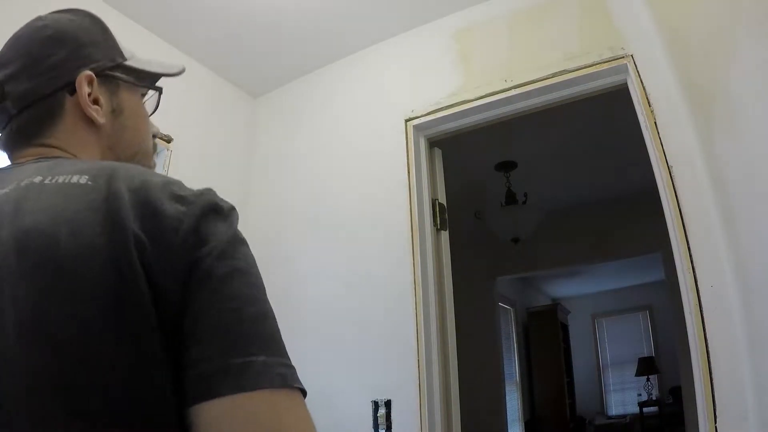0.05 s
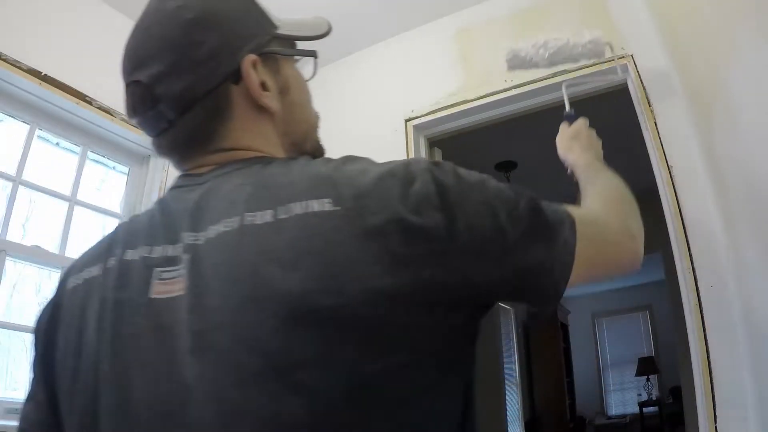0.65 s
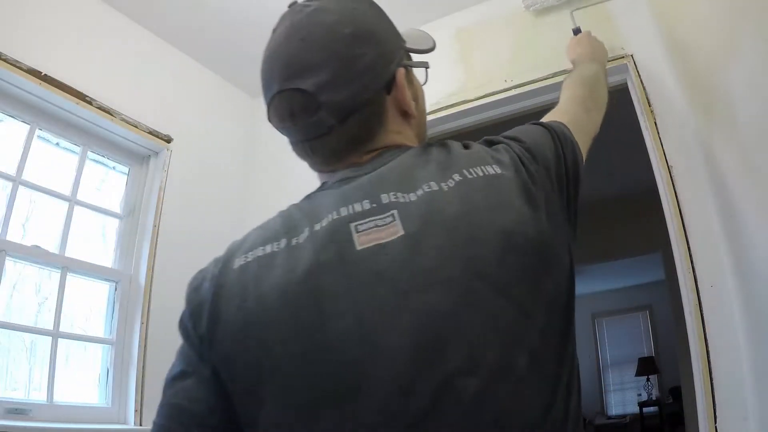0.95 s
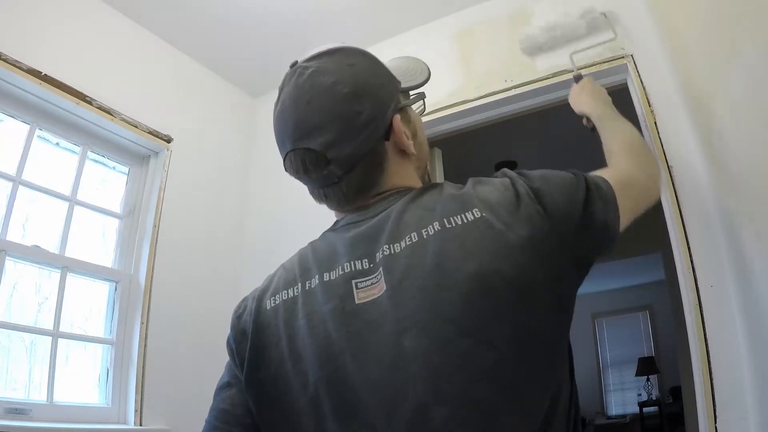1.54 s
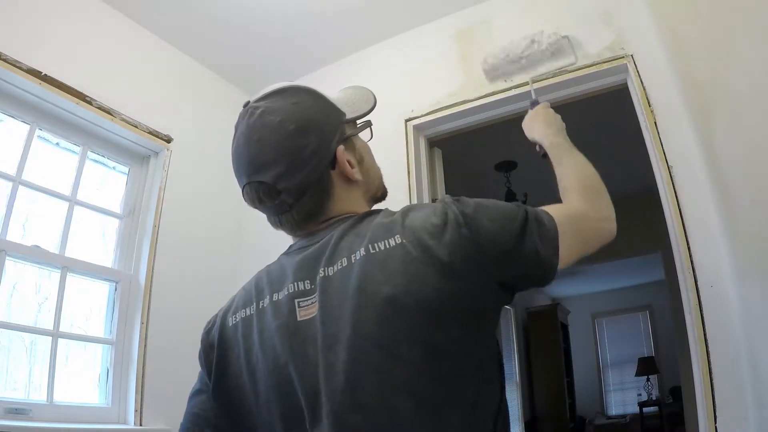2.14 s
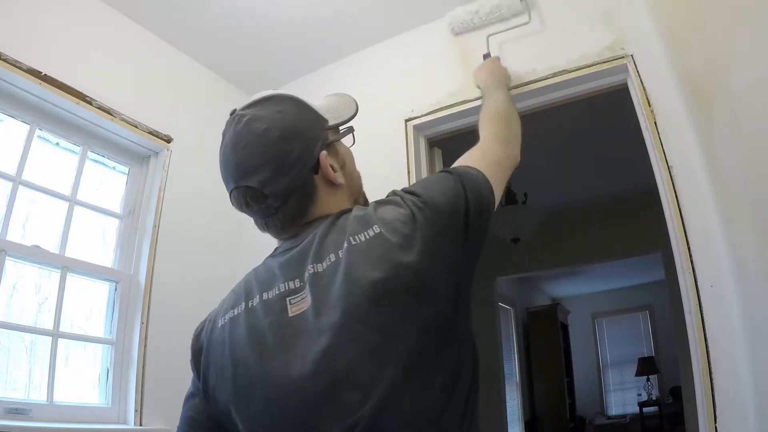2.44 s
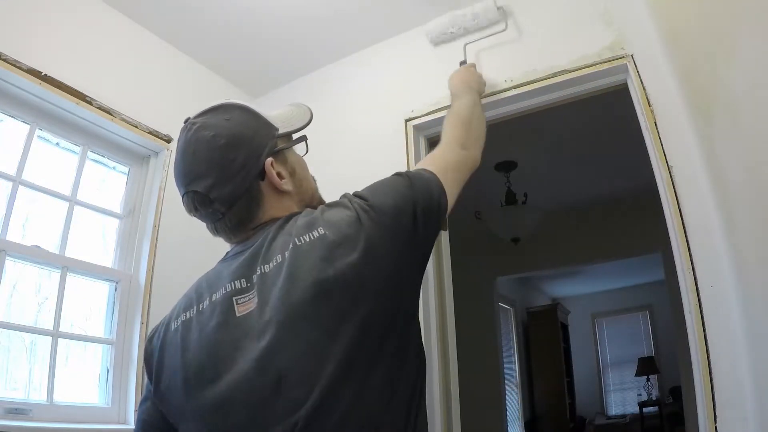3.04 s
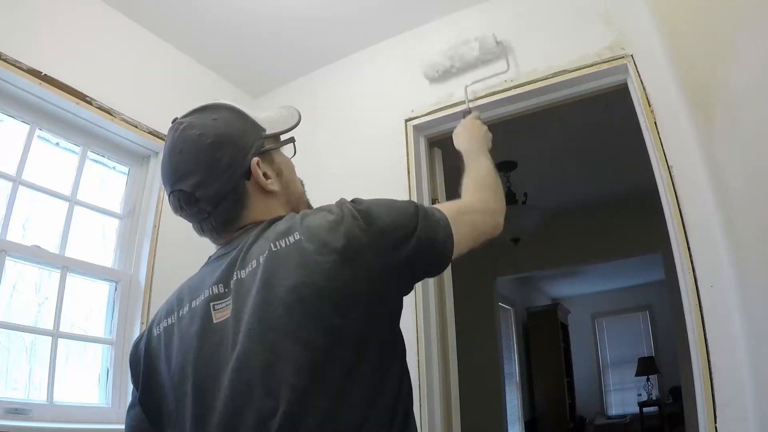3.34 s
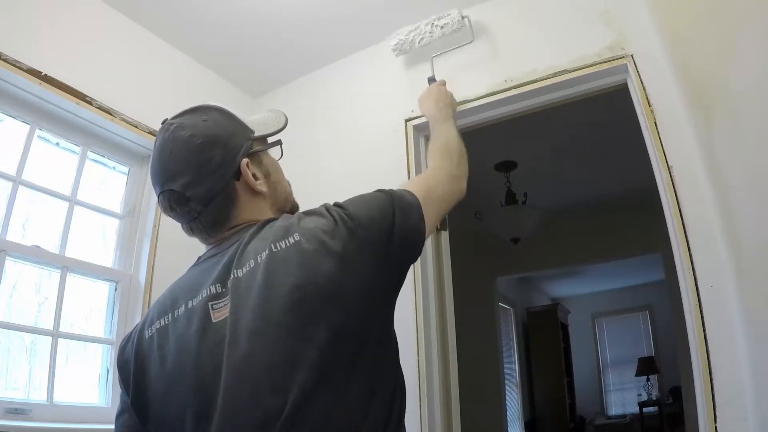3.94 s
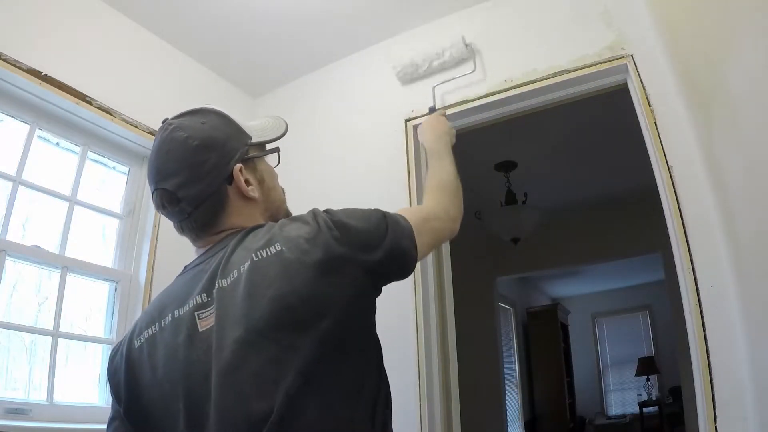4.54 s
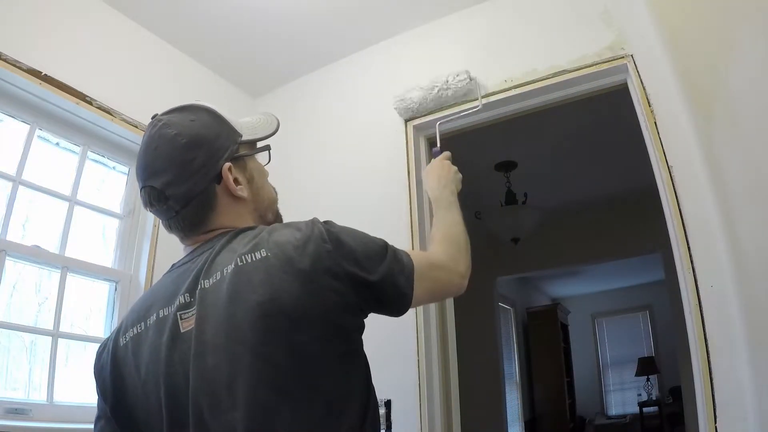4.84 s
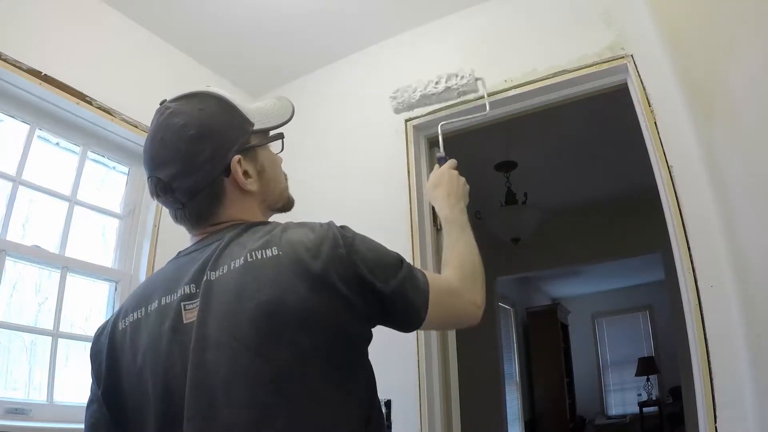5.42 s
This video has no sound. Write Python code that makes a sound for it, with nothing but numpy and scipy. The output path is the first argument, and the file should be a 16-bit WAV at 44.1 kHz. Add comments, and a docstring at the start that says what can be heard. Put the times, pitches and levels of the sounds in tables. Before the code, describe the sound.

A wet paint roller works over a hollow wall, slightly to the right, in a small room with a faint steady hush. It starts with short wet dabs, rustling clothes and low puffs of air against the microphone. Repeated sticky hissing strokes follow, each swelling and easing, with the roller thumping the wall and clacking in its wire frame. Faint sliding squeaks come through. The strokes pause briefly, then carry on more gently.

```python
"""A small bare room, where a wet paint roller is worked up and down the wall above a door.
Each stroke speeds up and slows again: threads of tacky paint snap off the nap as a hiss, and the
hollow wall rumbles beneath. Where a downstroke turns, the roller knocks in its wire frame and thumps
the wall. Faint tones slide in pitch. At first, as the painter steps up, clothes rustle and the
stirred air rumbles at the microphone."""
import sys
import numpy as np
from scipy import signal
from scipy.fft import rfft, irfft, next_fast_len
from scipy.io import wavfile
from scipy.ndimage import uniform_filter1d, map_coordinates

SR = 44100
rng = np.random.default_rng(int(sys.argv[2]) if len(sys.argv) > 2 else 0)


def transcribe(u):
    """Save the signal u as a 16-bit wav file named by the first command-line argument.

    u: samples, shape (n,) or (channels, n), limited to [-1, 1]; the rate is SR.
    q: integer samples, one column per channel.
    """
    v = np.clip(np.atleast_2d(u).T, -1, 1)
    q = np.round(v * 32767).astype(np.int16)
    wavfile.write(sys.argv[1], SR, q)


N = 250488

# Spectra of snapping paint and of the rumbling wall. Each row: frequency in Hz, relative level in dB.
HISS_SPECTRUM = [(400, -68), (2000, -26.5), (4500, -10.5), (5500, -3), (6300, 0.5), (7300, -3.5),
                 (8200, -10.5), (9700, -15), (11200, -26.5), (12500, -23.5), (15000, -35)]
RUMBLE_SPECTRUM = [(90, -49), (135, -2.5), (175, -7), (212, 1), (250, -7.5), (285, 0), (350, -10.5),
                   (450, -14.5), (900, -22), (2500, -66)]


def roller():
    """Shot noise: countless tiny snaps merge into hiss, rasp and squelch over the wall's rumble."""
    # Spectra of the dry and the wet nap. Each row: frequency in Hz, relative level in dB.
    rasp_spectrum = [(900, -15), (1800, -8.5), (2500, -2.5), (3400, -0.5), (4500, -4.5), (6500, -21),
                     (12000, -49)]
    squelch_spectrum = [(150, -17), (380, -3), (480, -4), (650, -0.5), (1000, -4.5), (1300, -2),
                        (1800, -4.5), (2600, -13), (5000, -47)]
    tack, dry, wet, roll = roller_gains()
    lumps = wobble(45)  # the nap is unevenly loaded
    tack *= amp(1.8 + 0.39 * lumps + 1.2 * wobble(70))
    hiss = tack * stereo(crackle(per_second=14000, spread_db=2.5), HISS_SPECTRUM)
    dry *= amp(1.0 + 1.57 * lumps + 0.97 * wobble(24.79))
    rasp = dry * stereo(crackle(per_second=8000, spread_db=1.5), rasp_spectrum)
    wet *= amp(2.0 + 0.66 * lumps + 1.26 * wobble(16))
    squelch = wet * stereo(crackle(per_second=2500, spread_db=1.5), squelch_spectrum)
    rumble = roll * amp(4 + 2.5 * lumps) * noise(RUMBLE_SPECTRUM)
    paint = room(hiss + rasp + squelch, wet_db=-12)
    return high_pass(paint + rumble, edge_hz=143)


def roller_gains():
    """Incoherent sources add in power: strokes and dabs set the gains of hiss, rasp, squelch, rumble."""
    # Each row: start and length in seconds, fastest moment as a share of the length, hiss gain in dB,
    # then rasp, squelch and rumble gains in dB relative to it.
    strokes = [(1.081, .41, 0.58, -38.5, -4.5, -7, -8), (1.462, .34, 0.52, -36.5, -8, -4.5, -4.5),
               (1.768, .37, 0.55, -35, -7, -7, -8.5), (2.089, .37, .58, -34.5, -6.5, -10.5, -10),
               (2.415, 0.39, .62, -34, -6, -9.5, -12), (2.748, .44, .49, -34.8, -6, -10, -10),
               (3.154, .42, .5, -33.5, -5.5, -10.5, -12), (3.507, 0.17, 0.61, -38.5, -3, -8, -11),
               (4.27, 0.34, 0.6, -43, -5.5, -11, -8.5), (4.464, .46, 0.56, -38, -4, -9.5, -9.5),
               (4.871, .27, 0.49, -36.5, -3, -10.5, -16), (5.096, .35, 0.64, -37, -3, -9.5, -7.5)]
    # The nap lands or peels off at once. Each row: start in seconds, hiss gain in dB, T60 in seconds,
    # then rasp and squelch gains in dB relative to the hiss.
    dabs = [(.11, -54, .24, -4, 0), (.25, -52, 1, -4, 1), (.397, -33.5, 0.57, -6.5, -2),
            (.44, -35, 0.33, -7, -4.5), (.52, -35, 0.34, -8, -8.5), (.625, -50, 0.53, -7, 2.5),
            (0.773, -47, 0.49, 0.5, 2), (1.011, -40.5, 0.17, -9, -12), (1.501, -40.5, 0.15, -8, -6),
            (1.6, -40, .2, -12, -6), (4.126, -42, 0.53, -4.5, -7), (5.326, -30.5, 0.16, -9.5, -7),
            (5.578, -46.5, 0.65, -3, -2.5)]
    paint_exponent, rumble_exponent, dab_rise_s = 1.43, 1.4, 0.019
    now, power = np.arange(N) / SR, np.zeros((4, N))
    for start, length, fastest, db, rasp_db, squelch_db, rumble_db in strokes:
        progress = np.interp(now, [start, start + fastest * length, start + length], [0, .5, 1])
        speed = abs(np.sin(np.pi * progress))
        power[:3] += np.outer(amp([db, db + rasp_db, db + squelch_db]), speed ** paint_exponent) ** 2
        power[3] += (amp(db + rumble_db) * speed ** rumble_exponent) ** 2
    for start, db, t60, rasp_db, squelch_db in dabs:
        age = np.maximum(now - start, 0)
        peel = np.minimum(age / dab_rise_s, 1) * amp(-60 * np.maximum(age - dab_rise_s, 0) / t60)
        power[:3] += np.outer(amp([db, db + rasp_db, db + squelch_db]), peel) ** 2
    return np.sqrt(power)


def crackle(per_second, spread_db, drift_db=1.6):
    """A Poisson process of tiny snaps, whose colour drifts from one patch of paint to the next."""
    happens = rng.random((2, N)) < per_second / SR
    sizes = rng.standard_normal((2, N)) * amp(spread_db * rng.standard_normal((2, N)))
    bands = signal.stft(happens * sizes, nperseg=512)[2]
    patches = uniform_filter1d(rng.standard_normal(bands.shape[1:]), size=9, axis=0)
    patches = uniform_filter1d(patches, size=7, axis=1)
    return signal.istft(bands * amp(drift_db * unit(patches)), nperseg=512)[1][:, :N]


def knocks():
    """Double impact: the loose roller touches first, and the weight of the arm follows as a blow."""
    # Each row: start and lag of the blow in seconds, thump and clack gains in dB for the touch, then
    # for the blow, pitch of the spot in Hz, clack tilt in dB per octave, ring in dB re the clack.
    impacts = [(.324, 0.0079, -47, -26, -30, -21, 645, -1, -15),
               (.481, 0.0028, -51, -42, -25, -37, 185, 10, -25),
               (1.014, .008, -48, -33, -28, -22.5, 357, -5.5, -19),
               (1.227, 0.00295, -48, -45, -23.5, -19.5, 227, -6, -32),
               (1.365, 0.0063, -30, -23.5, -9.5, -25, 231.3, 0.5, -18),
               (1.991, .013, -13.5, -18.5, -13, -28.5, 215, 1, -19),
               (2.668, .014, -13.5, -21, -9, -30, 240, 3, -22),
               (3.401, .016, -14, -20, -11, -26, 241, 0.5, -27),
               (3.533, 0.0023, -48, -38, -31, -31, 300, -5, -27),
               (3.754, .003, -48, -41, -27, -34, 317, 1, -13.5),
               (4.142, .013, -31.5, -24.5, -23, -36, 276, 2.5, -15.5),
               (4.43, .04, -39.5, -34, -32.5, -48, 303, 6, -12),
               (5.562, 0.024, -35, -41, -26.5, -41, 301, -1, -8)]
    touch_pitch_ratio = 1.1
    out = np.zeros((2, N))
    for start, lag, touch_db, touch_clack_db, blow_db, blow_clack_db, hz, tilt_db, ring_db in impacts:
        add(out, start, contact(touch_db, touch_clack_db, touch_pitch_ratio * hz, tilt_db, ring_db))
        add(out, start + lag, contact(blow_db, blow_clack_db, hz, tilt_db, ring_db))
    return high_pass(out, edge_hz=133)  # the knocks carry no deep bass


def contact(thump_db, clack_db, spot_hz, tilt_db, ring_db):
    """Impulsive excitation: the wall thumps and shudders, the roller clacks and its frame rings."""
    t = np.arange(SR // 2) / SR
    thump = amp(thump_db) * wall_thump(spot_hz, t)
    shudder = amp(thump_db - 19 - 60 * t / 0.41) * noise(RUMBLE_SPECTRUM, len(t), tilt_db=1.0)
    # Spectrum of the clack. Each row: frequency in Hz, relative level in dB.
    clack_spectrum = [(150, -15.5), (370, 0.5), (480, 4.5), (650, 5), (900, 4.5), (1350, 1), (1900, -4),
                      (2450, -5), (3200, -13.5), (5000, -18.5), (8000, -22.5), (15000, -58)]
    clack = amp(1.5 - 60 * t / 0.068) * noise(clack_spectrum, len(t), tilt_db)
    ring = amp(ring_db) * np.array([frame_ring(t, scatter_db=5.5), frame_ring(t, scatter_db=0.5)])
    cushion = 1 - np.exp(-t / 0.0011)  # the nap softens the blow
    wall = room(thump + shudder, wet_db=-16.5)
    return wall + amp(clack_db) * room(cushion * (clack + ring), wet_db=-4)


def wall_thump(spot_hz, t):
    """Resonance: the struck spot swings with one overtone and drives the modes near its pitch."""
    # Modes of wall and room. Each row: frequency in Hz, level in dB, T60 and rise time in seconds.
    wall_modes = [(190.4, -8.5, 0.29, 0.021), (217.8, -12.5, 0.31, 0.0032), (247.5, -16.5, 0.56, .02),
                  (283.5, -5.5, 0.25, 0.02), (315, -14, 0.43, 0.052), (349.9, -11, 0.27, 0.015),
                  (378, -13.5, 0.23, 0.0091)]

    def mode(hz, db, t60, rise):
        return amp(db - 60 * t / t60) * (1 - np.exp(-t / rise)) * np.sin(2 * np.pi * hz * t)

    swing = 1.9 * mode(spot_hz, db=0, t60=0.057, rise=0.0031)
    overtone_hz = 1.6 * spot_hz
    overtone = mode(overtone_hz, db=-13.5 - 12 * np.log2(overtone_hz / 350), t60=0.11, rise=0.0049)
    boom = sum(mode(hz, db - 4.8 * abs(np.log2(hz / spot_hz)), t60, rise)
               for hz, db, t60, rise in wall_modes)
    return swing + overtone + boom


def frame_ring(t, scatter_db):
    """Damped free vibration of the wire frame; the loose roller makes the phases wander."""
    # Each row: frequency in Hz, level in dB, T60 in seconds.
    frame_modes = [(880, -3, 0.13), (998, -18, 0.29), (1307, -7.5, 0.18), (2420, -6, 0.11),
                   (3280, -5, 0.14), (3960, -26, .18), (5180, -7.5, 0.28), (6790, -7.5, 0.23)]
    ring = np.zeros(len(t))
    for hz, db, t60 in frame_modes:
        envelope = amp(db + scatter_db * rng.standard_normal() - 60 * t / t60)
        wander = rng.random() + .02 * np.cumsum(rng.standard_normal(len(t))) / np.pi
        ring += envelope * np.sin(2 * np.pi * (hz * t + wander))
    return ring


def snaps():
    """Sudden release of tension: larger threads of paint break singly, each with a tick."""
    # Each row: start in seconds, level in dB.
    threads = [(.417, -32), (1.317, -24), (1.607, -25), (2.802, -36), (3.220, -34), (4.657, -28.5),
               (4.837, -33), (5.187, -29), (5.343, -33)]
    out, t = np.zeros((2, N)), np.arange(SR // 20) / SR
    for start, db in threads:
        add(out, start, amp(db - 60 * t / 0.024) * noise(HISS_SPECTRUM, len(t), tilt_db=-1.5))
    return room(out, wet_db=-1.0)


def sliding_tones(edge_s=0.017):
    """Random modulation of frequency and amplitude roughens faint tones as they slide and fade."""
    # Each row: start and length in seconds, first and last pitch in Hz, level in dB, fade in dB per
    # second, waver as a share of the pitch, relative amplitude of a partial a fifth above.
    glides = [(1.253, 0.11, 335, 365, -37, 100, 0.01, 0), (1.388, 0.11, 499, 524, -34.5, 60, 0.03, 0.05),
              (1.51, 0.07, 594, 619, -37, 20, .02, 0), (1.621, .2, 662, 809, -44.5, 40, 0.09, 0.24),
              (1.768, 0.18, 385, 462, -42, 90, 0.01, 0.86),
              (3.781, 0.056, 2510, 2430, -48.5, 67, 0.12, 0.1),
              (3.855, 0.072, 2300, 2050, -51.5, 70, .11, 0.1),
              (4.753, 0.11, 296.6, 232, -32, 53, 0.12, 0.15), (4.858, .22, 224.5, 194.5, -41.5, 15, .12, 0)]
    now, tones = np.arange(N) / SR, np.zeros(N)
    for start, length, first_hz, last_hz, db, fade, waver, fifth in glides:
        age = np.clip(now - start, 0, length)
        hz = first_hz + (last_hz - first_hz) * age / length
        phase = 2 * np.pi * np.cumsum(hz * (1 + waver * wobble(300))) / SR
        swell = np.minimum(np.minimum(age, length - age) / edge_s, 1)
        envelope = swell * amp(db - fade * age + 2.8 * wobble(60))
        tones += envelope * (np.sin(phase) + fifth * np.sin(1.5 * phase))
    return room(np.array([tones, tones]), wet_db=0)


def painter_movement():
    """Friction rustles the clothes; turbulence buffets both microphone ports, the right one most."""
    # Stirred air. Each row: time in seconds, level in dB.
    stir = [(0, -28.5), (.5, -34.5), (.62, -39), (.96, -40.5), (1.15, -35), (1.55, -49), (1.68, -39),
            (1.83, -57), (2.08, -43), (2.45, -55.5), (2.97, -56), (3.9, -69), (5.68, -69)]
    # Puffs of air. Each row: middle and half-width in seconds, gain in dB.
    puffs = [(.52, 0.048, -31), (.66, 0.055, -33), (.8, 0.062, -31.5), (1.14, 0.095, -42),
             (1.38, 0.085, -35.5), (1.56, .1, -47.5), (2.07, 0.062, -50), (2.7, .04, -55)]
    # Spectra of buffeting, cloth and deep air rumble. Each row: frequency in Hz, relative level in dB.
    buffet_spectrum = [(35, -40), (62, -3.5), (80, 9.5), (105, 0.5), (150, -3), (500, -49)]
    cloth_spectrum = [(100, -18), (170, 7.5), (300, 3), (600, -2.5), (1300, -6.5), (3000, -17),
                      (6500, -12.5), (12000, -40)]
    air_spectrum = [(10, -12), (28, -2), (40, -9), (62, -13.5), (130, -30.5), (400, -78)]
    now = np.arange(N) / SR
    stir_db = np.interp(now, *np.transpose(stir))
    gusts = sum(amp(db) * np.exp(-((now - middle) / width) ** 2) for middle, width, db in puffs)
    buffet = (gusts + amp(stir_db - 14.5)) * amp([[-8], [3]]) * noise(buffet_spectrum)
    rustle = amp(-46.5 + 0.24 * (stir_db - stir_db.max()) + 1.3 * wobble(11)) * noise(cloth_spectrum)
    return amp(stir_db) * noise(air_spectrum) + buffet + rustle


def room(x, wet_db):
    """Reverberation: each frequency dies away at its own rate in the bare room."""
    # Each row: frequency in Hz, T60 (the time to fall by 60 dB) in seconds.
    decay_times = [(200, 0.28), (1000, 0.34), (6000, 0.29), (14000, 0.1)]
    hz, t, bands = signal.stft(rng.standard_normal((2, SR // 2)), SR, nperseg=256)
    tail = signal.istft(bands * amp(-60 * t / along(decay_times, hz)[:, None]), SR, nperseg=256)[1]
    tail = np.pad(tail / np.linalg.norm(tail[0]), ((0, 0), (SR // 250, 0)))  # arrives 4 ms late
    wet = signal.fftconvolve(x, tail, axes=1)[:, :x.shape[1]]
    return (x + amp(wet_db) * wet) / np.hypot(1, amp(wet_db))


def quiet_house():
    """The noise floor: a faint, steady, mostly low hush."""
    # Each row: frequency in Hz, relative level in dB.
    hush_spectrum = [(100, -35), (150, 17), (220, 7.5), (450, 2), (1000, 0.5), (3000, -9.5), (4800, -13),
                     (6300, -7.5), (9000, -10), (15000, -25)]
    return amp(-50.5) * high_pass(noise(hush_spectrum), edge_hz=147)


def stereo(pair, spectrum, tilt_db=0):
    """Partial coherence: two unrelated signals are coloured and mixed as mid and side, to rms 1."""
    # Each row: frequency in Hz, correlation of left and right.
    correlation = [(130, 0.63), (290, 0.7), (630, -0.2), (1380, -0.05), (3000, 0.8), (6500, 0.23),
                   (12000, -0.25)]

    def response(hz):
        angle = np.arccos(along(correlation, hz)) / 2
        colour = amp(along(spectrum, hz) + tilt_db * np.log2((hz + 1) / 1000))
        return colour * [np.cos(angle), np.sin(angle)]

    mid, side = filtered(pair, response)
    return unit(np.array([mid + side, mid - side]))


def noise(spectrum, samples=N, tilt_db=0):
    """Stationary stereo noise of rms 1, tilted by tilt_db per octave."""
    return stereo(rng.standard_normal((2, samples)), spectrum, tilt_db)


def filtered(x, response):
    """Linear filtering: the spectrum of x times a frequency response."""
    n = x.shape[-1]
    padded = next_fast_len(n + 8192)
    return irfft(rfft(x, padded) * response(np.fft.rfftfreq(padded, 1 / SR)), padded)[..., :n]


def high_pass(x, edge_hz):
    """A causal sixth-order high-pass."""
    return signal.sosfilt(signal.butter(6, edge_hz, "high", fs=SR, output="sos"), x)


def wobble(rate):
    """A smooth random curve, rate knots a second."""
    return map_coordinates(rng.standard_normal(int(N * rate / SR) + 4), [np.arange(N) * rate / SR])


def along(points, hz):
    """Interpolation on a logarithmic frequency axis."""
    frequencies, values = np.transpose(points)
    return np.interp(np.log(hz + 1), np.log(frequencies), values)


def add(track, start_s, sound):
    """Superpose a sound on the track."""
    part = track[:, round(start_s * SR):][:, :sound.shape[-1]]
    part += sound[..., :part.shape[1]]


def amp(db):
    """Decibels to amplitude ratio."""
    return 10 ** (np.asarray(db) / 20)


def unit(x):
    """Normalisation to rms 1."""
    return x / np.sqrt(np.mean(x ** 2) + 1e-20)


def scene():
    """Superposition: the painting, slightly to the right, adds to the movement and the house's hush."""
    painting = (roller() + snaps() + knocks() + sliding_tones()) * amp([[-.3], [.3]])
    return painting + painter_movement() + quiet_house()


def record(dry):
    """Band limiting: an ideal low-pass removes the highest treble."""
    top_hz = 15050
    return filtered(dry, lambda hz: hz < top_hz)


dry = scene()
out = record(dry)
transcribe(out)
```